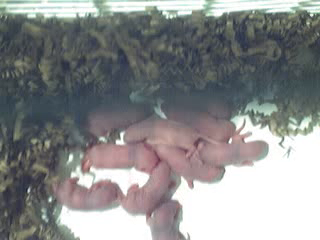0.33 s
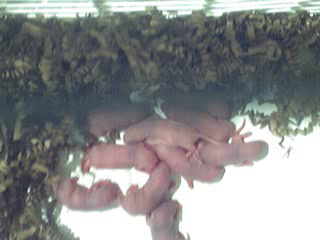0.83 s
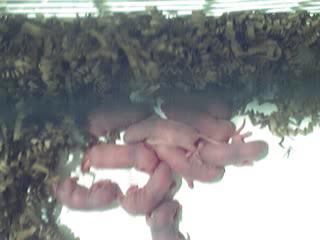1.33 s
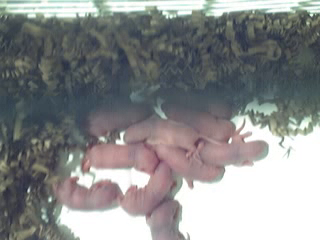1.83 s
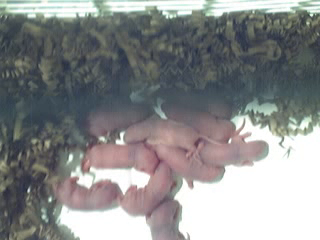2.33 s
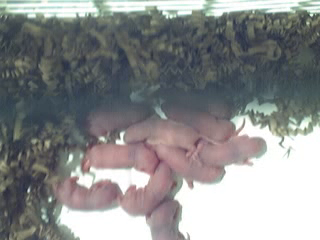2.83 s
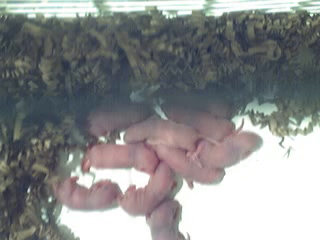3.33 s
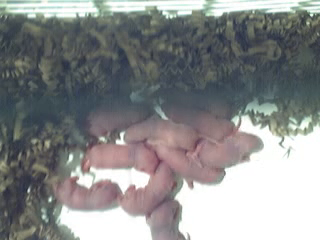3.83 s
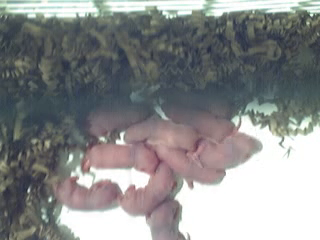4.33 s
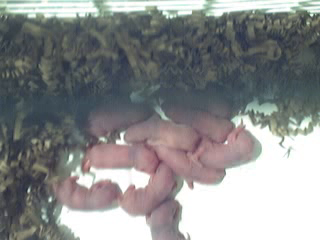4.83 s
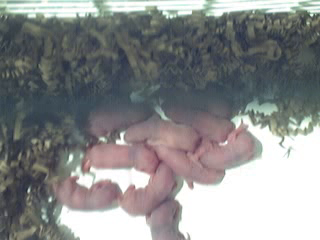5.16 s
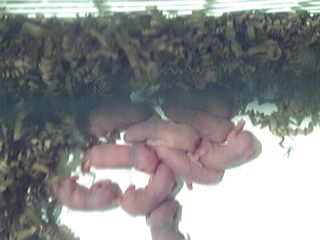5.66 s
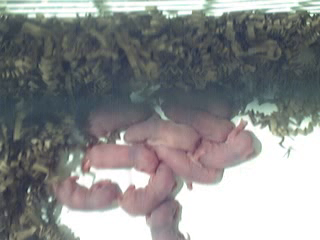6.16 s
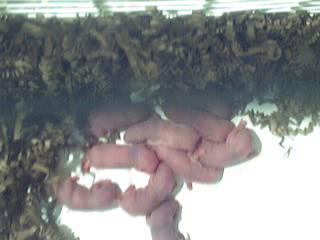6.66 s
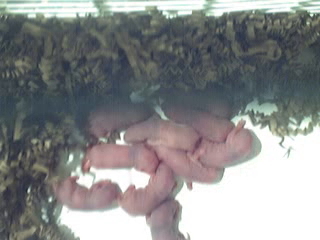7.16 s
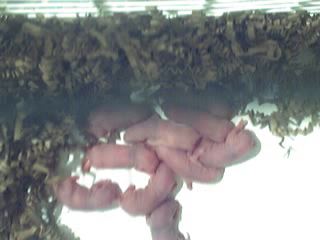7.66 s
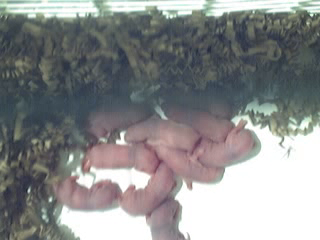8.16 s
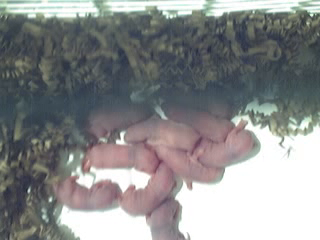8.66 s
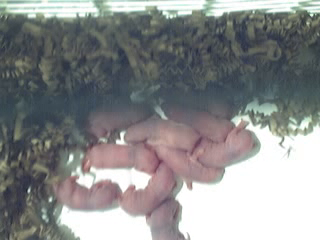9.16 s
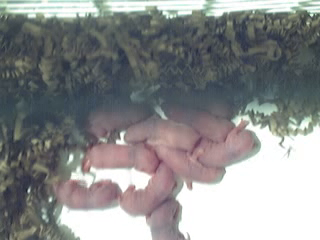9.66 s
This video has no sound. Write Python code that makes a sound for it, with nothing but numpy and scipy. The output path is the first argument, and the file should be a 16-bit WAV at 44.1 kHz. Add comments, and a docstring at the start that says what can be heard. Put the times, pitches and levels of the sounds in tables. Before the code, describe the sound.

Close inside a hard-walled tank, newborn rat pups push against shredded paper. A few sharp crunches come in the first second, then a lull, then scattered rustles from about three seconds. The strongest crackling burst arrives just after five seconds, with more shuffling around six. Movement thins to faint ticks by the end, over constant low rumble, mains hum, hiss and a faint ticking buzz.

```python
"""A hard-walled tank in a humming room: newborn rat pups squirm on shredded paper.
Each push of a body or paw is a swell of random fibre snaps, filtered into floor bump, crunch and sizzle.
Fainter clumped crackle stirs in between; close-wall flutter and a decaying tail make the tank ring.
Behind them: noise shaped into room rumble and microphone hiss, wavering sine hum and a fine ticking buzz."""
import sys
import numpy as np
from scipy import signal
from scipy.fft import rfft, irfft
from scipy.io import wavfile

SR = 44100
rng = np.random.default_rng(int(sys.argv[2]) if len(sys.argv) > 2 else 0)


def to_wav(s):
    """Save 16-bit WAV."""
    ch = np.atleast_2d(s).T  # columns
    pcm = np.round(np.clip(ch, -1, 1) * 32767)  # PCM
    wavfile.write(sys.argv[1], SR, pcm.astype(np.int16))


N = 438354
TIME = np.arange(N) / SR  # s
FREQS = np.maximum(np.arange(N // 2 + 1) * SR / N, 1)  # Hz


def from_db(db):
    """Decibels to amplitude gain."""
    return 10 ** (np.asarray(db) / 20)


def unit_rms(x):
    """Scale to an rms of 1."""
    return x / np.sqrt(np.mean(x ** 2) + 1e-20)


def at_hz(points, hz, axis=1):
    """Read one column of a table on a log-frequency axis."""
    table = np.array(points)
    return np.interp(np.log(hz), np.log(table[:, 0]), table[:, axis])


def coloured(x, gain):
    """Give a signal a spectrum; rms 1."""
    return unit_rms(irfft(rfft(x) * gain, len(x)))


def drift(rate_hz):
    """Random wandering with a spread of 1, mostly slower than the rate."""
    return coloured(rng.standard_normal(N), 1 / (1 + (FREQS / rate_hz) ** 2))


def causal(gain):
    """The filter with this gain that rings only after its input (minimum phase)."""
    cepstrum = irfft(np.log(gain + 1e-12))
    half = len(cepstrum) // 2
    folded = np.r_[cepstrum[0], 2 * cepstrum[1:half]]
    return np.exp(rfft(folded, len(cepstrum)))


# colour of room rumble and microphone hiss: [f/Hz, relative level/dB]
ROOM_COLOUR = [(20, -8.5), (130, -16.5), (185, -13.5), (215, -24), (270, -22), (335, -19), (520, -24.5),
               (1500, -34), (2080, -30), (2700, -39.5), (4600, -39), (7000, -44.5), (10600, -50.5),
               (10950, -67)]
ROOM_DB = -45  # rms


def rumble_and_hiss():
    """Steady noise, shaped from low rumble to high hiss."""
    noise = rng.standard_normal(N)
    return from_db(ROOM_DB) * coloured(noise, from_db(at_hz(ROOM_COLOUR, FREQS)))


# hum of mains and distant motors: [f/Hz, rms level/dB]
HUM_TONES = [(43, -49), (59.2, -47.5), (84, -58.5), (118.4, -52.5), (166.9, -56), (323, -59)]


def hum():
    """Sines of the mains and distant motors, each wavering in phase."""
    total = np.zeros(N)
    for hz, db in HUM_TONES:
        phase = 2 * np.pi * hz * TIME + 1.35 * drift(rate_hz=1.0)
        total += from_db(db) * np.sqrt(2) * np.sin(phase)
    return total


# colour of the interference ticks: [f/Hz, relative level/dB]
TICK_COLOUR = [(2500, -33.5), (4400, -10.5), (5100, -7), (6150, -4.5), (6600, -12), (7800, -11.5),
               (8400, -15), (9200, -16.5), (9700, -28), (11000, -55)]
BUZZ_DB, TICKS_PER_S = -62, 119.19  # rms level; two ticks per mains cycle


def buzz():
    """Mains interference: one sharp tick every half cycle, each of slightly different strength."""
    half_cycle = np.floor(TICKS_PER_S * TIME + .45)
    strengths = from_db(0.65 * rng.standard_normal(N))
    ticks = np.diff(half_cycle, prepend=0) * strengths
    return from_db(BUZZ_DB) * coloured(ticks, from_db(at_hz(TICK_COLOUR, FREQS)))


# broad colour of crushed bedding: [f/Hz, relative level/dB]
PAPER_COLOUR = [(30, -33), (80, -9), (122, -7), (185, -6.5), (245, -24), (600, -10), (1000, -14.5),
                (1450, -14.5), (1650, -21), (2000, -27), (4000, -8), (5200, -16), (6500, -18),
                (9250, -19.5), (9550, -27), (10700, -36.5), (11200, -47)]
# resonances of the tank and its floor: [f/Hz, width/Hz, relative level/dB]
TANK_RESONANCES = [(129, 33, 0), (185, 25, -0.5), (351, 106, 0), (500, 200, -2), (807, 38, -10.5),
                   (1100, 240, -9.5), (2130, 220, -8.5), (2300, 180, -5), (2490, 140, 0.5),
                   (2994, 160, -3.5), (3220, 150, -1), (3370, 63, 0), (3558, 360, 1.5), (3860, 340, -12),
                   (4650, 320, -7), (4690, 290, -4.5), (5720, 420, -11), (8600, 600, -43)]


def bedding_colour(hz):
    """Paper spectrum plus tank resonances, summed in power; the very top fades away."""
    power = from_db(at_hz(PAPER_COLOUR, hz)) ** 2
    for centre, width, db in TANK_RESONANCES:
        power = power + from_db(db) ** 2 / (1 + 2 * ((hz - centre) / width) ** 2) ** 2
    return np.sqrt(power / (1 + (hz / 12000) ** 12))


def snaps(per_s, spread_db, size):
    """Paper fibres give way at random: many small snaps, a few large ones."""
    sizes = from_db(spread_db * np.minimum(rng.exponential(1, size), 4))
    signs = rng.choice([-1, 1], size)
    happens = rng.random(size) < per_s / SR
    return sizes * signs * happens


# faint stirring of the heap, before the tank rings: [t/s, rms level/dB]
STIR_LEVELS = [(0.0, -51), (1.3, -58), (1.7, -53), (2.1, -61.5), (2.7, -75), (3.03, -40), (3.35, -55.5),
               (3.8, -36), (4.12, -62), (4.28, -41), (4.65, -60), (4.95, -52), (5.18, -31), (5.7, -36.5),
               (5.98, -56), (6.4, -38.5), (7.2, -52), (7.9, -66.5), (8.7, -54.5), (9.5, -58.5),
               (9.9, -51.5)]
CLUMPS_HZ = 22  # how fast the crackle thickens and thins


def stirring(clump_db):
    """Tiny fibre snaps in small clumps as the heap settles."""
    level = from_db(np.interp(TIME, *np.transpose(STIR_LEVELS)))
    clumps = from_db(clump_db * drift(CLUMPS_HZ))
    crackle = snaps(per_s=500, spread_db=3.0, size=N) * clumps
    return level * coloured(crackle, bedding_colour(FREQS))


SWELL_SHAPE = 1.21  # higher: a rounder rise and a quicker release


def swell(ms, peak_ms):
    """A force that rises from 0 ms to 1 at peak_ms and relaxes."""
    age = np.maximum(ms, 0) / peak_ms
    return (age * np.exp(1 - age)) ** SWELL_SHAPE


STRAIN_MS, STRAIN_DB = 6, -21.5  # the paper creaks around the onset as it takes the load
SETTLE_MS, SETTLE_DB = 22, -27.5  # a softer swell of settling paper
STRIP_DB, STRIP_WIDTH = 5.5, 0.07  # boost at the bent strip's pitch; half-width as a part of that pitch
# edges of the floor, strip and fibre bands: [low f/Hz, high f/Hz]
PUSH_BANDS = [(0, 1800), (1800, 5200), (5200, 22050)]
# higher strips sizzle more: [strip f/Hz, fibre sizzle level/dB against the crunch]
FIBRE_SIZZLE = [(2300, -14), (3500, -14.5), (4750, -6.5), (8600, -0.5)]
# pushes on the bedding; levels are band energy against the force:
# [t/s, swell t/ms, paper crunch level/dB, floor bump level/dB, bent strip f/Hz]
BEDDING_PUSHES = [(0.094, 4.5, -36, -34.5, 2370), (0.315, 9.3, -36, -35, 2920),
                  (0.358, 4.35, -13, -18.5, 3100), (0.541, 3.3, -36.5, -58, 2490),
                  (0.702, 5.5, -33.5, -36, 4040), (0.895, 1.16, -8.5, -23, 3540),
                  (0.973, 2.2, -20, -30, 6700), (1.024, 2.2, -32, -30.5, 2400), (1.47, 4, -35.5, -32, 2520),
                  (1.599, 5.8, -40, -43.5, 4360), (1.721, 1.3, -34.5, -58, 3220),
                  (1.805, 1.4, -29.5, -55, 4730), (1.833, 1.5, -35.5, -63, 8600),
                  (2.759, 7.4, -12, -16, 2680), (2.878, 5.9, -28.5, -32.5, 4500),
                  (3.077, 15, -30.5, -47, 4530), (3.109, 1.93, -13.5, -29, 4670),
                  (3.154, 3.6, -20, -33.5, 8700), (3.26, 4, -23.5, -27, 3330),
                  (3.396, 12.5, -39, -36.5, 2780), (3.557, 21.6, -36, -41.5, 4600),
                  (3.671, 5, -31.5, -34.5, 4900), (3.717, 6.1, -31, -33, 6500),
                  (3.795, 2.9, -27.5, -31.5, 2300), (3.854, 6.8, -32.5, -31, 2300),
                  (3.912, 15.8, -35, -38, 6200), (4.076, 3, -37, -37.5, 4880), (4.294, 6.1, -36, -27, 3000),
                  (4.329, 13, -22, -34.5, 5600), (4.366, 13.4, -24, -35, 4330), (4.487, 6, -34, -41, 2390),
                  (4.825, 14.5, -44, -40.5, 2580), (5.193, 5.4, -16, -21, 3000),
                  (5.234, 6.1, -12, -18, 3100), (5.315, 17, -12.5, -19, 4420),
                  (5.322, 1.56, -3.5, -7.5, 3600), (5.387, 4.2, -9, -20.5, 3760),
                  (5.499, 2.5, -21.5, -27.5, 3300), (5.525, 9.3, -24.5, -25.5, 4340),
                  (5.586, 9.5, -14, -19.5, 4530), (5.855, 7.4, -36, -35, 3120),
                  (5.917, 5.1, -37.5, -37, 3380), (6.043, 6.9, -31, -47, 3040),
                  (6.083, 9, -31.5, -39.5, 2640), (6.122, 15, -35.5, -34, 4400),
                  (6.173, 8.7, -15.5, -19, 4170), (6.231, 8.7, -15.5, -21, 3400),
                  (6.262, 11.2, -12.5, -19, 2980), (6.343, 7.7, -24.5, -28.5, 3860),
                  (6.454, 1.8, -32.5, -29.5, 3380), (6.586, 9.6, -30.5, -34, 2720),
                  (6.827, 1.7, -19.5, -23.5, 3450), (6.863, 1.9, -20, -32, 2540),
                  (6.898, 10.7, -33.5, -31.5, 2320), (6.922, 2, -20.5, -33, 2300),
                  (7.014, 3, -35.5, -44, 2300), (7.206, 7.2, -38, -46, 4000),
                  (7.28, 2.3, -24.5, -36.5, 3970), (7.317, 3.2, -25, -33, 3760),
                  (7.399, 8.7, -39.5, -39.5, 4400), (7.934, 4.3, -32, -34.5, 4100),
                  (8.134, 2.4, -43.5, -61, 4420), (8.577, 7.1, -45, -52, 3030),
                  (8.785, 9, -45.5, -49, 3550), (9.112, 9.5, -47.5, -44, 3620), (9.266, 3, -43, -48, 4200),
                  (9.354, 1.3, -37.5, -56, 4650)]


def pushes(size=8192):
    """Each push strains, swells and settles; it bumps the floor, crunches strips and snaps fine fibres."""
    out = np.zeros(N + size)
    hz = np.maximum(np.arange(size // 2 + 1) * SR / size, 1)
    lead = size // 4  # room for the strain before the push
    ms = (np.arange(size) - lead) * 1000 / SR
    bedding = bedding_colour(hz)
    strain = from_db(STRAIN_DB) * np.exp(-np.abs(ms) / STRAIN_MS)
    settle = from_db(SETTLE_DB) * swell(ms, SETTLE_MS)
    for start, swell_ms, crunch_db, bump_db, strip_hz in BEDDING_PUSHES:
        force = swell(ms, swell_ms) + strain + settle
        # the paper sticks and slips, so the crackle comes in clumps
        slip_noise = coloured(rng.standard_normal(size), 1 / (1 + (hz / 140) ** 2))
        slips = from_db(3.8 * slip_noise)
        crackle = rfft(force * slips * snaps(per_s=2000, spread_db=3.5, size=size))
        # the bent strip favours its own pitch
        strip_peak = 1 / (1 + ((hz / strip_hz - 1) / STRIP_WIDTH) ** 2)
        gain = bedding * (1 + (from_db(STRIP_DB) - 1) * strip_peak)
        # the work of the push is shared among floor, strips and fibres
        work = np.sum(force ** 2)
        sizzle_db = crunch_db + at_hz(FIBRE_SIZZLE, strip_hz)
        for (low, high), db in zip(PUSH_BANDS, (bump_db, crunch_db, sizzle_db)):
            band = (hz > low) & (hz <= high)
            energy = 2 * np.sum(np.abs(crackle * gain)[band] ** 2) / size
            share = from_db(db) * np.sqrt(work / (energy + 1e-20))
            gain = np.where(band, gain * share, gain)
        first = int(start * SR) - lead
        out[first:first + size] += irfft(crackle * causal(gain))
    return out[:N]


# the lingering tail: [f/Hz, level/dB against the sound fed in, t60/s]
TAIL_BANDS = [(100, 3.5, 0.63), (360, -5, 0.4), (890, -2.5, 0.4), (1760, -5.5, 0.32), (2020, 0.5, 0.49),
              (2520, -5.5, 0.71), (2860, -7.5, 0.23), (4500, -9, 0.33), (9000, -4, 0.18)]


def tail(count=24):
    """Response of the lingering ring: bands of noise, each dying at its own rate."""
    hz = np.maximum(np.arange(SR // 2 + 1), 1)
    centres = np.geomspace(80, 12000, count)
    noises = rfft(rng.standard_normal((2, SR)))  # neighbouring bands use different noise
    response = np.zeros(SR)
    for k, centre in enumerate(centres):
        band = np.sqrt(np.interp(np.log(hz), np.log(centres), np.arange(count) == k))
        dying = from_db(-60 * TIME[:SR] / at_hz(TAIL_BANDS, centre, axis=2))
        ring = unit_rms(irfft(noises[k % 2] * band) * dying)
        band_level = np.sqrt(np.mean(band ** 2) / SR)
        response += from_db(at_hz(TAIL_BANDS, centre)) * band_level * ring
    return response


# round trips between the close walls: [t/s]
WALL_TRIPS = [.0031, .0023, .0013, .0005]
WALL_REFLECTION = 0.83  # part kept on each trip


def tank(x, flutter_db):
    """Close walls, as all-pass loops, smear each snap into a short flutter; a tail lingers."""
    flutter = x + 1e-18  # keeps the loops clear of vanishingly small numbers
    for delay in WALL_TRIPS:
        loop = np.r_[1, np.zeros(int(delay * SR)), -WALL_REFLECTION]
        flutter = signal.lfilter(loop[::-1], loop, flutter)
    lingering = signal.fftconvolve(x, tail())[:N]
    return from_db(flutter_db) * flutter + lingering


def scene():
    """The pups in their tank, over the room."""
    background = rumble_and_hiss() + hum() + buzz()
    pups = stirring(clump_db=3.5) + pushes()
    return (background + tank(pups, flutter_db=-0.56))[None]


CUTOFF_HZ = 11700


def record(dry):
    """The loudest peaks are rounded, the top is cut and the converter rests a little below zero."""
    ceiling, offset = .8, -.0772  # full scale = 1
    rounded = dry / (1 + (dry / ceiling) ** 6) ** (1 / 6)
    low_pass = signal.cheby1(10, .3, CUTOFF_HZ, fs=SR, output="sos")  # .3 dB ripple
    return signal.sosfilt(low_pass, rounded) + offset


dry = scene()
out = record(dry)
to_wav(out)
```